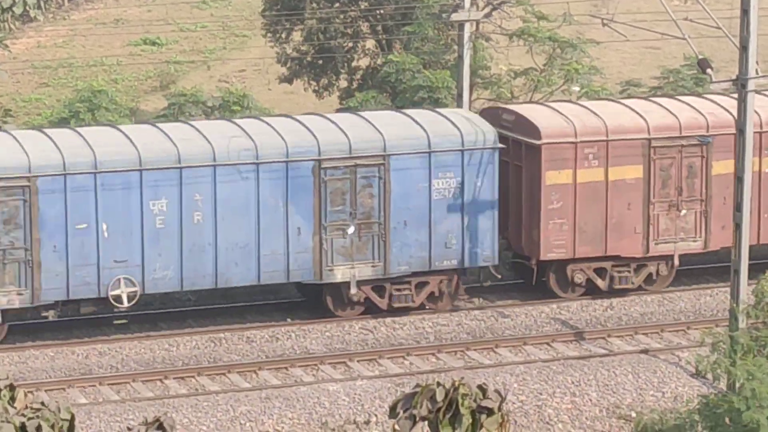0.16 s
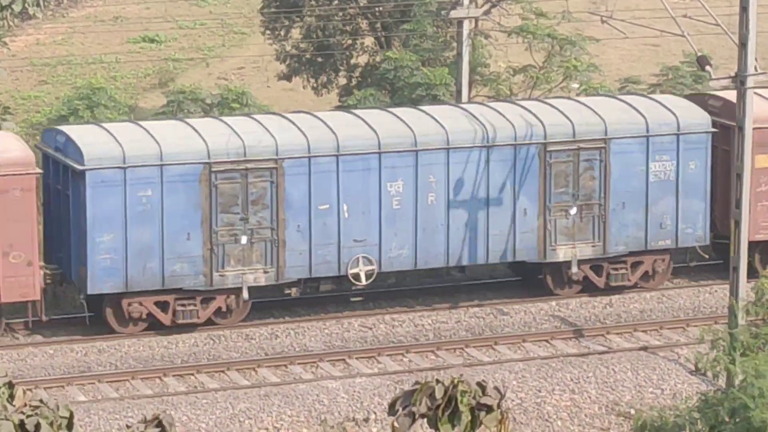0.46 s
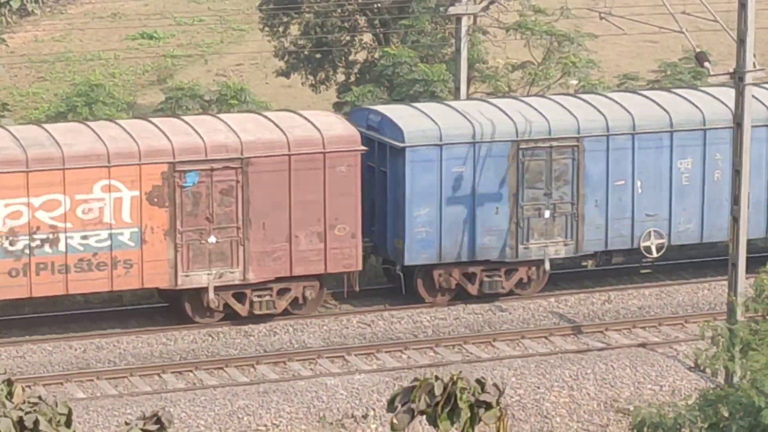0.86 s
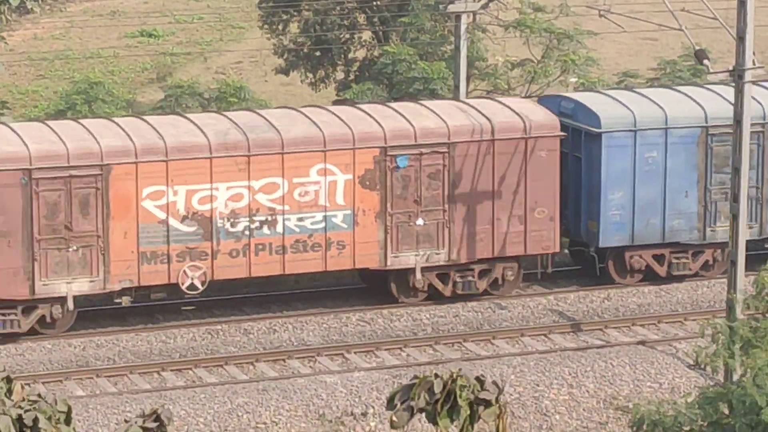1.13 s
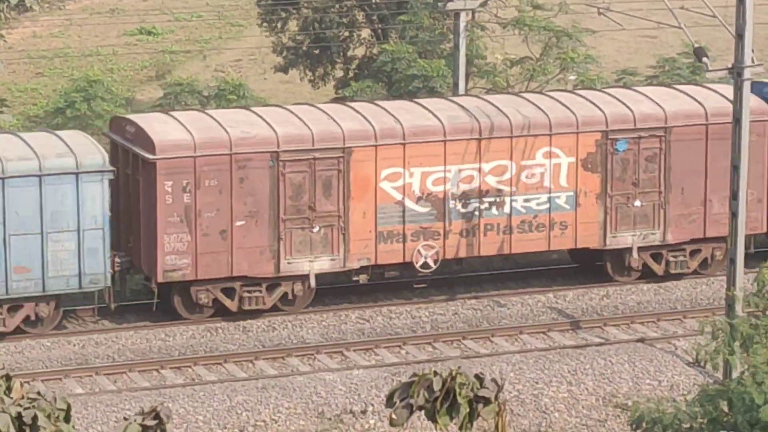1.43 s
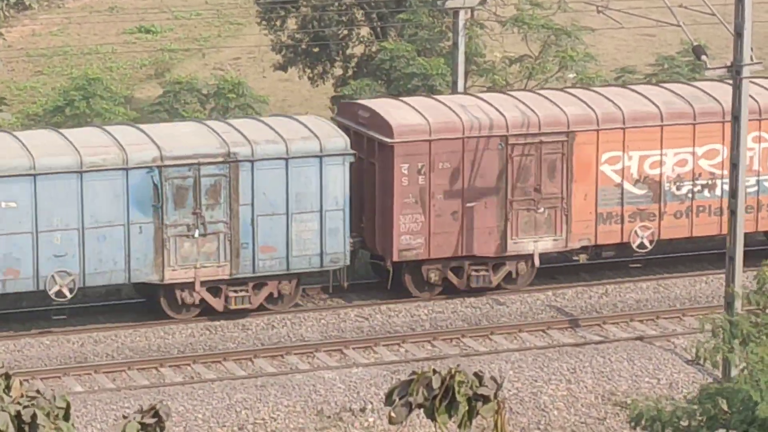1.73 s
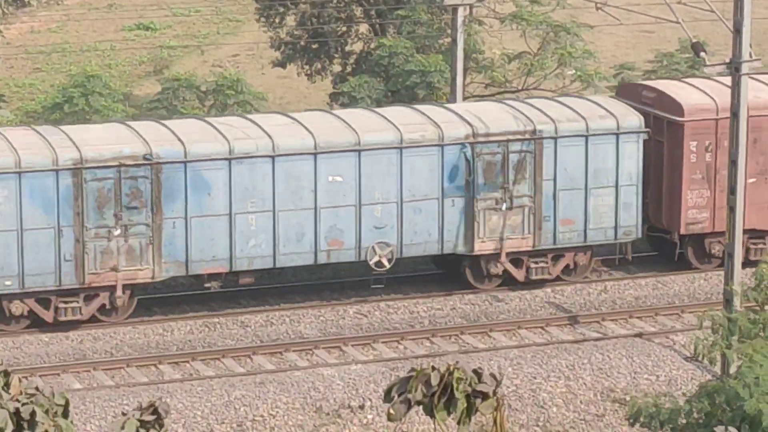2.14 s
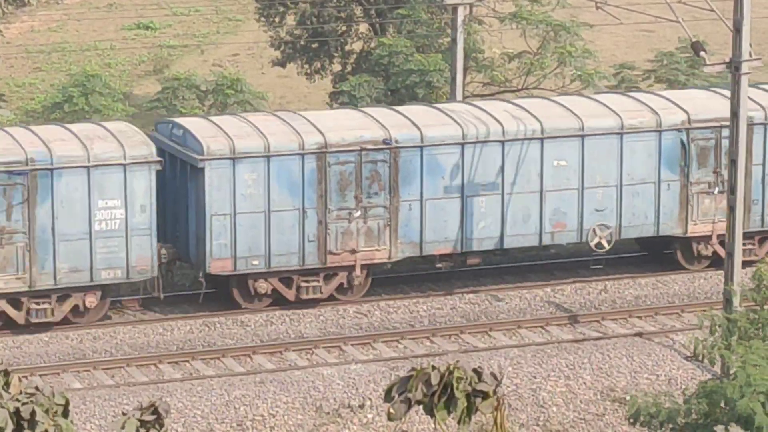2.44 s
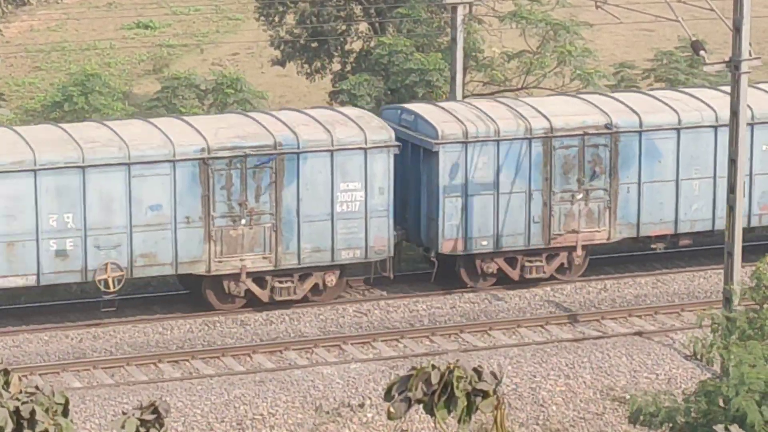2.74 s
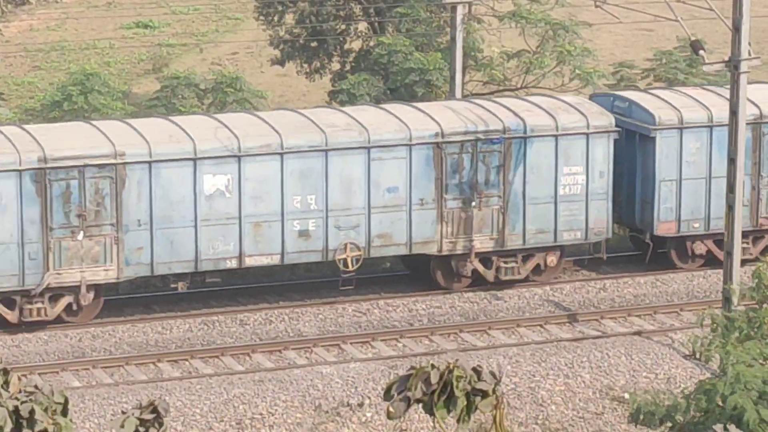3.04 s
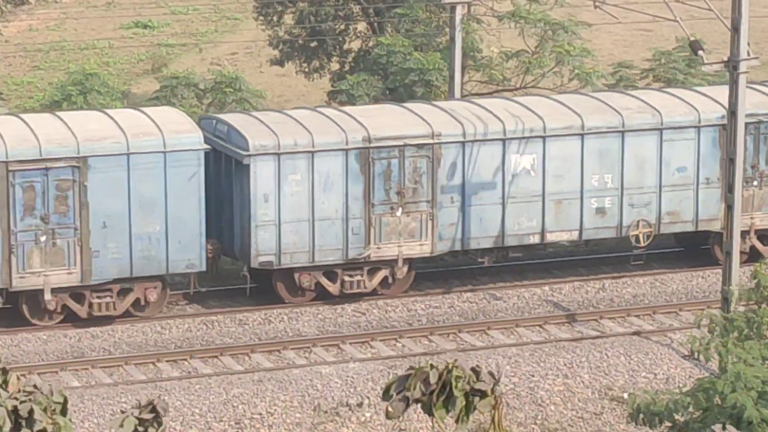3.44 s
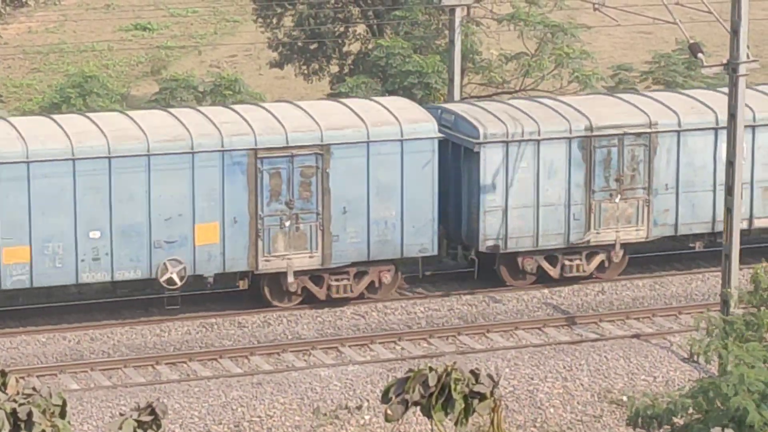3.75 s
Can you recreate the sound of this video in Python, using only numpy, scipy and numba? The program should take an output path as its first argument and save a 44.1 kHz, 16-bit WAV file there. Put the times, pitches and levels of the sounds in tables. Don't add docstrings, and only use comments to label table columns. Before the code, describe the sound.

Freight train rolls past with a steady low roar, brief steel squeals and heavy wind buffeting

```python
import sys
import numpy as np
from scipy import signal
from scipy.io import wavfile
from scipy.ndimage import uniform_filter1d
from numba import njit

SR = 44100
rng = np.random.default_rng(int(sys.argv[2]) if len(sys.argv) > 2 else 0)


def elevation(decibels):
    levels = np.asarray(decibels, float)
    return 10 ** (levels / 20)


def unload_wav(signal):
    wavfile.write(
        sys.argv[1],
        SR,
        np.round(np.clip(np.atleast_2d(signal).T, -1, 1) * 32767).astype(np.int16),
    )


N = 171108


def rolling():
    # [f/Hz, density/dB per Hz]
    roughness = [(40, 15), (280, 5.5), (480, -5), (900, -11), (1300, -20), (3000, -18), (6000, -20.5),
                 (7800, -40.5)]
    # [f/Hz, width/Hz, level/dB]
    wheels = [(875, 220, -40.5), (1703, 680, -45.5), (2632, 470, -45), (4250, 400, -54)]
    # [t/s, length/s, rise of the rolling noise/dB]
    joints = [
        (0.031, .08, 0.5),
        (0.568, 0.029, 2),
        (0.453, 0.067, 1.5),
        (1.156, 0.098, 3.5),
        (1.432, .04, 1),
        (2.258, 0.046, 2.5),
        (2.93, 0.032, 1),
        (3.083, 0.03, 1),
    ]
    t = np.arange(N) / SR
    curve_hz, curve_db = np.array(roughness, float).T
    sway = walk(1.5)
    roar = 0
    for hz in 40 * 2 ** (np.arange(24) / 3):
        density = np.interp(np.log(hz), np.log(curve_hz), curve_db)
        band_db = density + 10 * np.log10(hz)
        roar = roar + elevation(band_db + .4 * sway + .8 * walk(6)) * ring(hz, .3 * hz)
    resonances = sum(elevation(db + walk(4.88)) * ring(hz, width) for hz, width, db in wheels)
    clatter_db = sum(db * np.exp(-((t - start) / length) ** 2) for start, length, db in joints)
    return elevation(clatter_db) * (elevation(-25) * unit(roar) + resonances)


def flanges():
    # [t/s, scrape level/dB, extra level of the lower scrape/dB]
    pressure = [(0, -44.5, -4.5), (.29, -50, -0.5), (.33, -53.5, -2), (.55, -50.5, 0), (.61, -43.5, -2),
                (.7, -51.5, -1), (.79, -47, -6.5), (.81, -45, -8), (1.0, -42.5, -3.5), (1.11, -36.5, -1),
                (1.23, -39, -4), (1.4, -54.5, 6.5), (1.7, -57, 3.5), (1.75, -44.5, -9), (1.87, -52, 2.5),
                (2.5, -57.5, 1.5), (2.66, -51.5, -0.5), (3.88, -56, -0.5)]
    # [f/Hz, width/Hz, level/dB]
    scrapes = [(7370, 1170, 2.5), (6780, 900, -2), (5800, 1800, 4), (4220, 1200, -1), (2390, 2100, 0)]
    # [t/s, length/s, f/Hz, width/Hz,
    # level/dB]
    squeals = [
        (0, 0.17, 5930, 200, -54),
        (0.973, .06, 7070, 150, -37.5),
        (1.038, .2, 7340, 250, -39.5),
        (1.07, .1, 5900, 600, -45),
        (1.19, 0.058, 6900, 150, -52),
        (1.717, 0.059, 7380, 500, -44.5),
        (2.896, 0.072, 6850, 400, -49.5),
        (2.203, 0.13, 4520, 80, -50),
        (3.404, 0.21, 4250, 80, -53),
        (2.589, 0.17, 7200, 600, -47),
               (0, .2, 7450, 50, -50),
        (.2, .07, 5300, 90, -53),
        (.23, .04, 6850, 80, -50),
        (.25, .1, 7430, 50, -49),
        (.64, .11, 7030, 35, -49),
    ]
    # [t/s, length/s, f/Hz, width/Hz, level/dB]
    chirp = [
        (.57, .06, 7600, 50, -47),
        (.585, .075, 4070, 25, -43),
        (.59, .045, 6630, 50, -43),
        (.59, .035, 5740, 70, -44),
    ]
    edge, fade = .02, .4

    t = np.arange(N) / SR
    press_db, depth_db = column(pressure, index=1), column(pressure, index=2)
    out = 0
    for hz, width, db in scrapes:
        lower_db = depth_db * (hz < 6200)
        out = out + elevation(press_db + db + lower_db + 1.5 * walk(21.76)) * ring(hz, width)
    for start, length, hz, width, db in squeals + chirp:
        opening = (t - start) / edge + .5
        closing = (start + length - t) / (edge + fade * length) + 0.64
        gate = np.clip(np.minimum(opening, closing), 0, 1) ** 2
        gate_rms = np.sqrt(np.mean(gate ** 2))
        out = out + elevation(db) * unit(gate * ring(hz, width)) * gate_rms
    return out


def wind():
    # [t/s, level/dB, share of small eddies/dB]
    gusts = [(0, -16, -6), (.1, -37.5, 18), (.36, -29.5, -1), (.45, -24.5, 10.5), (.62, -24, 7),
             (1.04, -27, -4.5), (1.14, -13.5, 9.5), (1.3, -18, 7), (1.47, -8.5, -8.5), (1.62, -16, -3.5),
             (1.73, -13.5, -2.5), (1.86, -18, -5), (2.26, -14.5, -1.5), (2.45, -16, -12), (3.04, -27, -3),
             (3.3, -28, -5), (3.45, -16, -4.5), (3.88, -20.5, -17)]
    # [t/s, peak/dB, f/Hz]
    buffets = [(0.41, -24, 81), (1.385, -9, 59), (1.515, -9, 90), (1.575, -1.5, 61), (2.17, -10, 45),
               (2.075, -10, 120), (1.726, -3, 152), (1.802, -13.5, 81), (1.982, -9, 63), (2.032, -7.5, 59),
               (2.282, -13.5, 90), (2.417, -4, 104), (3.177, -3, 97.6), (3.214, -10, 35.7),
               (3.285, -12, 40), (3.335, -13.5, 105), (3.355, -10.5, 67), (3.432, -8.5, 79),
               (3.57, -11.5, 33.4), (3.626, -15.5, 60.3),
               (1.255, -9, 60),
        (1.345, -9, 55),
        (1.452, -7, 36),
        (1.705, -7, 85),
        (3.562, -7, 120),
    ]
    big_hz, mid_hz, small_hz, puff_hz = 34.6, 90, 320, 238
    rise, cycles, sag = 0.0041, 1.44, 0.18

    t = np.arange(N) / SR
    level_db, small_db = column(gusts, index=1), column(gusts, index=2)
    flutter_db = 1.5 * walk(25.025)

    big = lowpass(rng.standard_normal(N), big_hz) * elevation(-2.5 + 1.1 * walk(9))
    mid = lowpass(rng.standard_normal(N), mid_hz)
    mid = unit(mid + .2 * (mid ** 2 - 1))
    mid = mid * elevation(-1.0 + 0.25 * small_db + flutter_db)
    small = lowpass(lowpass(rng.standard_normal(N), small_hz), 3.27 * small_hz)
    small = small * elevation(-9 + small_db + 0.53 * flutter_db)
    air = (big + mid + small) * elevation(level_db)

    puff = lowpass(lowpass(rng.standard_normal(N), puff_hz), 1.59 * puff_hz)
    for start, db, hz in buffets:
        age = np.clip(t - start, 0, None)
        turns = np.log1p(sag * hz * age) / sag
        shape = (1 - np.exp(-age / rise)) * np.exp(-(turns / cycles) ** 2)
        thud = np.sin(2 * np.pi * turns) + elevation(-12) * puff
        air = air + elevation(db + 2) * shape * thud
    return air


def unit(x):
    return x / np.sqrt(np.mean(x ** 2))


def column(table, index):
    rows = np.array(table, float)
    return np.interp(np.arange(N) / SR, rows[:, 0], rows[:, index])


def walk(rate):
    hold = int(SR / rate)
    steps = np.repeat(rng.standard_normal(N // 200), hold)[:N]
    return unit(uniform_filter1d(uniform_filter1d(steps, hold), hold))


@njit
def svf(x, hz, damping):
    out, band, low = np.empty((2, len(x))), 0., 0.
    for i in range(len(x)):
        g = np.tan(np.pi * hz[i] / SR)
        v = (band + g * (x[i] - low)) / (1 + g * (g + damping))
        out[0, i], out[1, i] = low + g * v, damping * v
        band, low = 2 * v - band, low + 2 * g * v
    return out


def lowpass(x, hz):
    return unit(svf(x, np.full(N, 1. * hz), 1.54)[0])


def ring(hz, width):
    centre = np.full(N, 1. * hz)
    once = svf(rng.standard_normal(N), centre, 1. * width / hz)[1]
    return unit(svf(once, centre, 1.78 * width / hz)[1])


def scene():
    return (rolling() + flanges() + wind())[None]


def low_pass(x):
    return signal.sosfilt(signal.butter(12, 8440, fs=SR, output="sos"), x)


def record(dry):
    x = signal.sosfilt(signal.butter(1, 7.0, "high", fs=SR, output="sos"), dry)
    x = np.tanh(x)
    below = signal.sosfiltfilt(signal.cheby1(8, .3, 7570, fs=SR, output="sos"), x)
    shelf = signal.sosfiltfilt(signal.butter(6, 8350, fs=SR, output="sos"), x - below)
    return low_pass(below + shelf * elevation(-10))


dry = scene()
out = record(dry)
unload_wav(out)
```